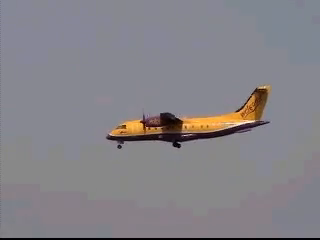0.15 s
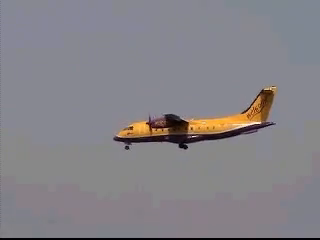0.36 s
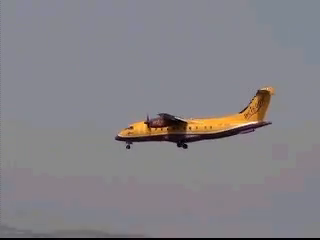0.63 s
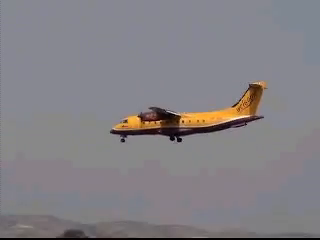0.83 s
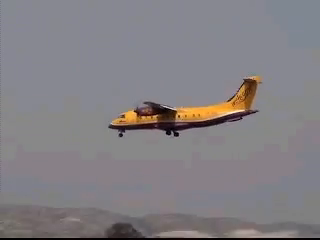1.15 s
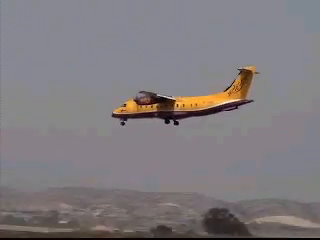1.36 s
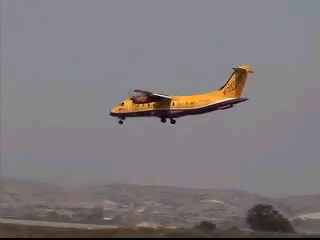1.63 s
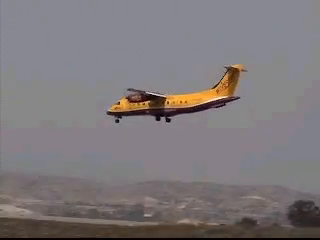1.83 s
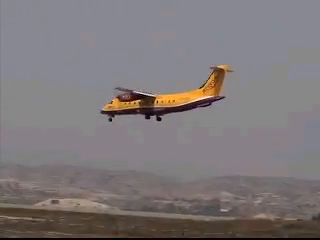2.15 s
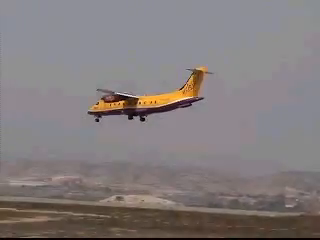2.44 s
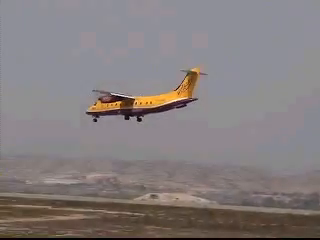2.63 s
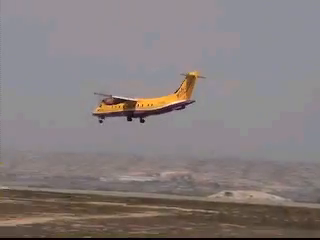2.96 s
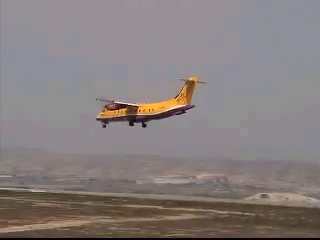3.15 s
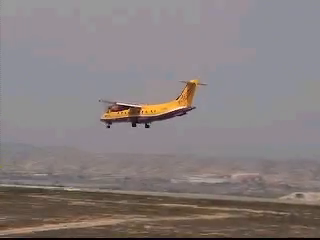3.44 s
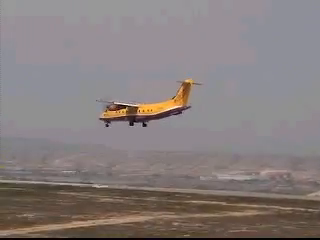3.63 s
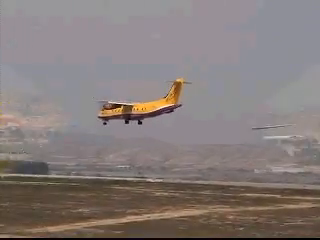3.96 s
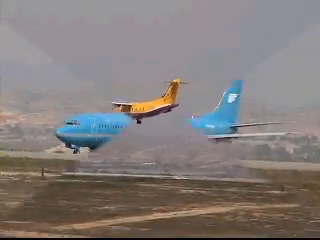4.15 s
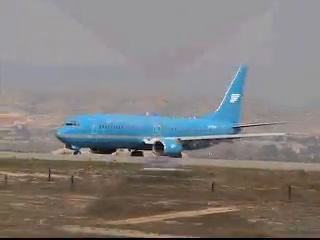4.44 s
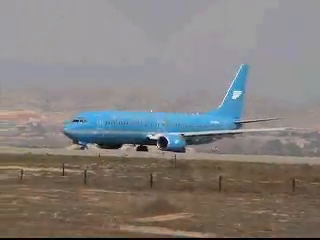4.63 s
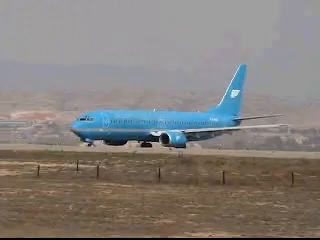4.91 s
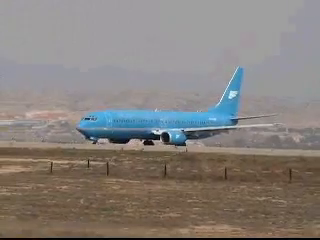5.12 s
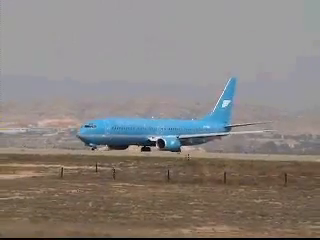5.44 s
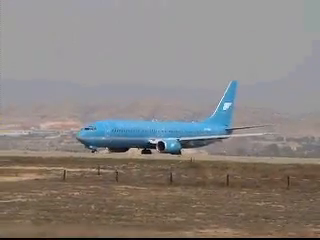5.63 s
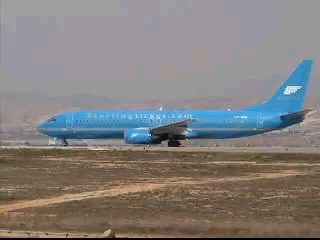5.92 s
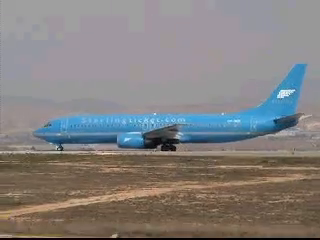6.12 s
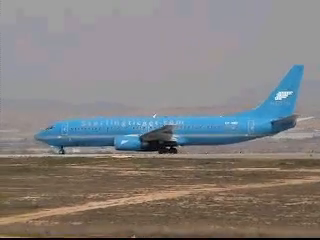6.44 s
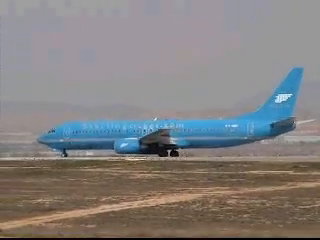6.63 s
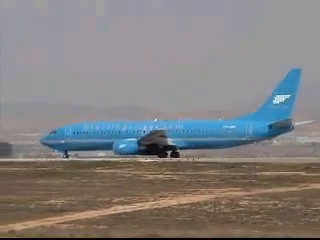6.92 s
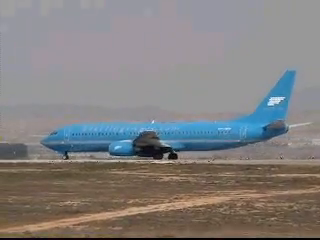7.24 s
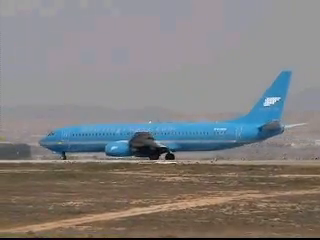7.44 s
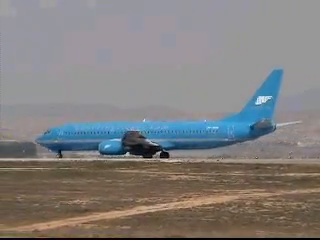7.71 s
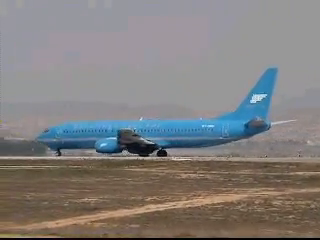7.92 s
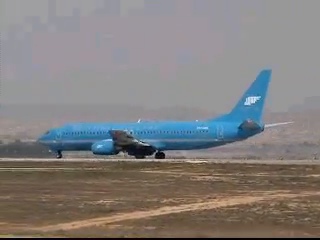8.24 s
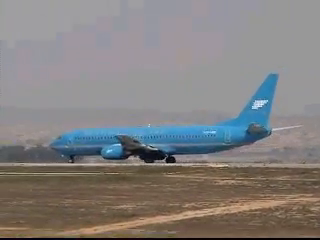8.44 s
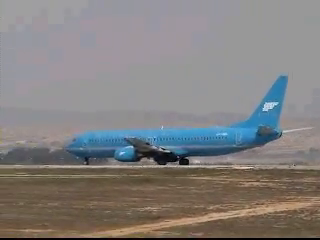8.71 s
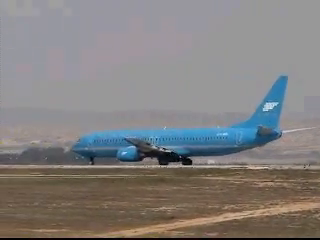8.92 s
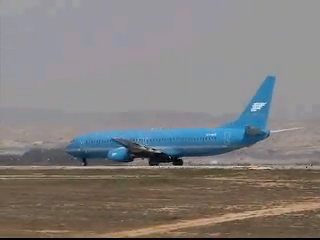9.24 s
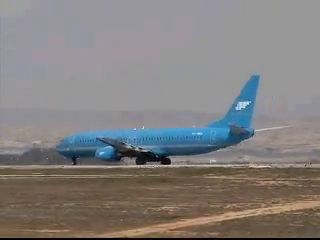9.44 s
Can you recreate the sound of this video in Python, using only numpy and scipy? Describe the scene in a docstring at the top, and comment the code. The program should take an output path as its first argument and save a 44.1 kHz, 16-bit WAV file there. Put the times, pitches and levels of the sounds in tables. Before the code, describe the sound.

Twin-propeller aircraft recedes with falling, wavering buzz and crackly hiss, giving way to a faint taxiing jet's roar, thin whistle and buffeting wind.

```python
"""A twin turboprop draws away past an airfield fence, then fades out as a jet rolling far off fades in.
Its blade tones are fluttering sines of sinking pitch; its exhaust roar is banded noise with a ground echo.
The jet is steadier banded noise with fan tones and a whistle blurred into narrow bands of noise.
Wind adds lumpy low noise and short thumps at the microphone; a narrow digital channel carries it all."""
import sys
import numpy as np
from scipy import signal
from scipy.fft import rfft, irfft, next_fast_len
from scipy.io import wavfile
from scipy.ndimage import uniform_filter1d, minimum_filter1d

SR = 44100
rng = np.random.default_rng(int(sys.argv[2]) if len(sys.argv) > 2 else 0)


def output_pcm(signal):
    """Save a mono or channel-first signal as 16-bit PCM at the path in sys.argv[1].

    Samples are clipped to [-1, 1] before scaling.
    """
    pcm = np.clip(np.atleast_2d(signal).T, -1, 1) * 32767
    wavfile.write(sys.argv[1], SR, np.round(pcm).astype(np.int16))


N = 422037
TIME = np.arange(N) / SR

# Wind gusts over the steady breeze: middle_s, length_s, level_db
GUSTS = [(4.5, 0.45, -36), (5.583, 0.15, -38.5), (5.98, 0.45, -27.5), (6.198, 0.22, -35), (6.38, .24, -31),
         (7.925, 0.2, -36), (8.195, 0.52, -38), (8.45, 0.11, -39), (8.933, 0.2, -45)]
# Single eddies striking the microphone: thump_s, peak_db, pitch_hz
BUFFETS = [(4.658, -16.5, 118), (5.564, -20, 83.4), (5.85, -23, 90), (5.925, -19, 95), (5.969, -18, 75),
           (5.988, -17, 170), (6.007, -10, 150), (6.027, -10.5, 132), (6.05, -20, 120), (6.085, -15, 106),
           (6.163, -20, 110), (6.172, -14.5, 396), (6.181, -19, 160), (6.195, -20, 80), (6.23, -24, 85),
           (6.284, -16, 87), (6.345, -17, 56), (6.397, -15.5, 127), (6.432, -24, 99), (6.932, -21, 150),
           (7.811, -21, 180), (7.879, -21, 155), (7.911, -20, 120), (7.936, -17, 120), (7.987, -24, 80),
           (8.293, -28, 90), (8.316, -13.5, 150), (8.446, -23, 119), (8.482, -20, 100), (8.804, -21, 125),
           (8.89, -23, 130), (8.923, -27, 125)]
# Spectral density of the jet's roar, relative: frequency_hz, density_db
JET_SPECTRUM = [(30, -31), (70, -1), (170, 8), (515, -10), (836, -4.5), (1360, -15.5), (2450, -15.5),
                (4800, -22), (5200, -60)]
# Jet fan tones: time_s, fundamental_db, second_harmonic_db, third_harmonic_haze_db
FAN_LEVELS = [(4.9, -44, -41, -48), (5.3, -37, -44, -44), (5.6, -39, -52, -48), (5.8, -40, -38, -43),
              (6.05, -39.5, -49, -46), (6.3, -35.5, -36.5, -47), (6.6, -38, -44.5, -43),
              (6.95, -38, -40.5, -42.5), (7.2, -39, -50, -35), (7.4, -35.5, -48, -44),
              (7.62, -42, -46, -43), (7.8, -45, -50, -41), (8.1, -41, -46.5, -51), (8.6, -37, -48, -39),
              (8.9, -42, -43.5, -45.5), (9.5, -42, -48.5, -43.5)]
# Jet whistle, which comes and goes: time_s, level_db
WHISTLE_LEVEL = [(4.9, -56), (5.2, -51), (5.3, -57), (5.45, -48), (5.7, -53), (6, -47), (6.1, -58),
                 (6.21, -48), (6.35, -55), (6.65, -52), (6.8, -60), (6.93, -50), (7.03, -58), (7.23, -48),
                 (7.33, -60), (7.48, -48), (7.7, -54), (7.9, -59), (8.17, -52), (8.35, -62), (8.62, -52),
                 (8.95, -56), (9.12, -50), (9.25, -57), (9.55, -55)]
# Blade rate as heard, sinking as the aircraft draws away: time_s, pitch_hz
BLADE_RATE = [(0, 143), (1.35, 140.5), (2.45, 133.5), (4.1, 122.5), (5.1, 113)]
# Propeller tones: time_s, blade_tone_db, second_harmonic_db (the second harmonic is played 1 dB lower)
BLADE_LEVELS = [(0, -32.5, -37), (.55, -29, -32), (.75, -31, -31), (1.3, -20.5, -32), (1.5, -31, -26),
                (1.75, -25, -42), (1.95, -21, -27.5), (2.45, -18.5, -35), (2.75, -21.5, -24.5),
                (2.92, -29, -32.5), (3.05, -25, -29), (3.3, -19.5, -24), (3.48, -27.5, -33),
                (3.62, -20, -24), (3.75, -26.5, -23.5), (3.97, -27, -45), (4.15, -25.5, -30.5),
                (4.45, -33, -41), (4.75, -33, -41), (5.1, -38, -49)]
# Surfacings of the third blade harmonic: middle_s, length_s, level_db (played 1 dB lower)
THIRD_BLADE_SWELLS = [(2.196, 0.64, -28.5), (3.14, 0.65, -26.5)]
# Spectral density of the turboprop's roar, relative: frequency_hz, density_db
ROAR_SPECTRUM = [(30, -34), (85, -12.5), (170, -16), (320, 0), (500, -2.5), (1050, 0.5), (1180, -7),
                 (1400, -7.5), (1700, -8.5), (1930, -6.5), (2100, -14.5), (2550, -4), (2750, -8),
                 (3000, -9), (3900, -6.5), (4200, -2.5), (4420, -4.5), (4800, -3.5), (5200, -23)]
# Turboprop roar by band: time_s, deep_db, low_db, buzz_db, hollow_db, middle_db, upper_db
ROAR_LEVELS = [(0, -34, -29.5, -26, -29, -22.5, -27.5), (.4, -34, -38, -31.5, -27.5, -30, -33.5),
               (.65, -34, -35.5, -28, -27.5, -26.5, -28), (.9, -33, -32, -26.5, -25, -22.5, -29.5),
               (1.15, -33, -31, -28, -26, -20, -28), (1.4, -32, -31, -28, -26.5, -20, -27),
               (1.65, -33, -34, -28, -30, -22, -28), (1.9, -31, -33, -24, -29.5, -24.5, -32),
               (2.15, -34, -29.5, -26, -27.5, -25, -31.5), (2.4, -29, -34, -24, -38, -22, -32.5),
               (2.65, -33, -31.5, -34, -24, -28.5, -27), (2.9, -32.5, -42, -21, -34, -22, -30),
               (3.15, -29, -30, -25.5, -36, -24.5, -29.5), (3.4, -31, -36, -24.5, -29.5, -23.5, -28.5),
               (3.65, -36, -34, -27, -29, -25, -28), (3.85, -30, -34, -28, -29, -27, -29),
               (4, -33, -40, -33.5, -33.5, -27, -32.5), (4.4, -34.5, -39, -30, -35, -28, -34),
               (4.6, -37, -43, -41, -49, -38, -47), (5.1, -49, -48, -48, -52, -39, -36)]
# Turboprop hiss, twinkling in turbulent air:
# time_s, lower_db, middle_db, upper_db (the upper band is played 3.5 dB lower)
HISS_LEVELS = [(0.0, -26, -35, -23), (0.03, -27, -31, -25), (0.06, -34, -36, -33), (0.07, -34, -29.5, -24),
               (0.24, -33, -33, -32), (0.28, -30.5, -27.5, -28), (0.48, -38, -29.5, -27.5),
               (0.68, -25.5, -32, -24), (0.77, -26, -24, -20), (0.79, -30, -34, -27), (0.85, -37, -34, -31),
               (0.88, -30, -24, -32), (0.96, -36, -27.5, -25.5), (1.14, -29, -20.5, -22),
               (1.18, -32, -29, -26), (1.36, -28, -23, -24), (1.39, -27, -27, -31), (1.43, -32, -30, -24),
               (1.48, -30, -25, -35), (1.53, -25.5, -24.5, -20.5), (1.62, -24, -30, -29),
               (1.67, -22, -19, -17.5), (1.73, -28, -30, -20.5), (1.87, -35, -27.5, -33.5),
               (1.89, -32, -34, -27.5), (2.03, -30, -25, -28), (2.23, -31.5, -30.5, -28),
               (2.37, -23, -28, -26.5), (2.41, -27, -24, -20), (2.43, -25, -29, -26), (2.48, -30, -22, -27),
               (2.53, -35, -31.5, -32), (2.64, -36, -32, -23), (2.68, -24, -28, -29), (2.7, -29, -23, -28),
               (2.81, -25, -28, -21.5), (2.84, -34, -25, -26), (2.88, -29, -34, -26),
               (2.94, -28, -27, -21.5), (3.17, -33, -31, -29.5), (3.21, -30, -33, -20),
               (3.22, -31, -23, -21), (3.27, -34, -32, -28), (3.41, -28, -22, -20), (3.49, -29, -30, -27.5),
               (3.54, -26, -29, -20), (3.58, -34, -26, -26), (3.69, -29, -30, -24.5),
               (3.74, -33, -35, -25.5), (3.81, -29, -27, -24.5), (3.93, -33, -28, -23.5),
               (3.95, -31, -26, -20.5), (4.1, -35.5, -31, -28), (4.35, -33, -33, -29),
               (4.67, -52, -42, -41), (4.76, -43, -37.5, -37), (4.94, -48, -44, -36.5),
               (4.96, -50, -56, -58), (5.01, -47, -41, -37), (5.1, -50, -48, -54)]

# Wind
BREEZE_DB, LUMPY_DB = -35.5, 1.5

# Jet
JET_FADE_S = (3.64, 5.2)  # start and end of the fade-in, shared by the wind's rumble
JET_LOW_DB, JET_MID_DB, JET_HISS_DB = -35, -33, -38.5  # at the end of the fade-in
JET_TOP_DB = -4.5  # relative to the hiss below it
JET_SINK_DB_PER_S = 0.18  # as it rolls away
DIP_S, DIP_LENGTH_S, DIP_DB = 6.06, .2, -3.5  # the hiss dips briefly
ABEAM_S, ABEAM_LENGTH_S, ABEAM_DB = 7.1, 2.4, 1.9  # the jet rolls level with the fence
TOP_SWELL_S, TOP_SWELL_LENGTH_S, TOP_SWELL_DB = 5.48, 1.5, 3  # brighter early on
FAN_HZ, SECOND_HZ, THIRD_HZ, WHISTLE_HZ = 838, 1669, 2525, 4340
THIRD_CORE_DB, FOURTH_DB = -50.5, -51.5
HAZE_RATE = 422  # random steps per s that blur the third harmonic's haze
# steady part of each line beside its random part of spread 1
FAN_CLEAR, SECOND_CLEAR, THIRD_CLEAR, WHISTLE_CLEAR = 1.7, 1.7, 1.2, 3.5

# Turboprop
HUM_HZ, HUM_SAG_HZ_PER_S = 688, 30  # a short hum in the roar
HUM_S, HUM_LENGTH_S, HUM_DB = 3.05, .85, -28  # start, length, level
GROUND_SHARE = .38
GROUND_LAG_S, GROUND_TURN_RAD = 0.001385, 1  # bounce off the soil: mean delay, phase

# Channel
BAND_HZ, CHANNEL_RATE_HZ, TOP_HZ = 4500, 32000, 12790
CEILING, LIMIT_S = .7, .004


def undb(db):
    """Level is logarithmic: 20 dB is a factor of ten in amplitude."""
    return 10 ** (np.asarray(db) / 20)


def unit(x):
    """Normalisation to a root-mean-square amplitude of 1."""
    return x / np.sqrt(np.mean(x ** 2))


def columns(table):
    """Linear interpolation of each curve against time, one value per sample."""
    s, *rest = np.transpose(table)
    return [np.interp(TIME, s, c) for c in rest]


def swell(middle_s, length_s):
    """Raised-cosine envelope: a smooth rise from 0 to 1 and back."""
    return np.cos(np.pi * np.clip((TIME - middle_s) / length_s, -.5, .5)) ** 2


def walk(rate):
    """Slow random modulation: levels held 1 / rate s and smoothed twice, of spread 1."""
    hold = int(SR / rate)
    steps = np.repeat(rng.standard_normal(N // hold + 1), hold)
    smooth = uniform_filter1d(uniform_filter1d(steps, hold), hold)
    return unit(smooth[:N])


def bands(spectrum, edges_hz):
    """Spectral shaping of white noise, split at soft edges into neighbouring bands of rms 1."""
    size = next_fast_len(N)
    f = np.maximum(np.arange(size // 2 + 1) * SR / size, 1)
    hz, db = np.transpose(spectrum)
    noise = rfft(rng.standard_normal(size)) * undb(np.interp(np.log(f), np.log(hz), db))
    # each band is the difference of two neighbouring high-pass curves
    above = [1] + [1 / (1 + (e / f) ** 12) for e in edges_hz] + [0]
    return [unit(irfft(noise * (a - b), size)[:N]) for a, b in zip(above, above[1:])]


def tone(hz, db, flutter_db, flutter_rate, waver):
    """Turbulent propagation: a sine flutters in level and wavers in pitch by a given fraction."""
    phase = 2 * np.pi * np.cumsum(hz * (1 + waver * walk(flutter_rate))) / SR
    level = undb(db + flutter_db * walk(flutter_rate))
    return np.sqrt(2) * level * np.sin(phase)


def breathy(hz, blur_rate, clear=0):
    """Random modulation by turbulent air: a line blurs into narrow noise around a clear, wavering share."""
    phase = 2 * np.pi * hz * TIME + np.cumsum(walk(blur_rate)) * blur_rate / SR
    in_phase = (clear + walk(blur_rate)) * np.sin(phase)
    quadrature = walk(blur_rate) * np.cos(phase)
    return unit(in_phase + quadrature)


def wind_rumble():
    """Turbulent pressure fluctuation: lumpy low noise follows the strength of the gusts."""
    strength = undb(BREEZE_DB) + sum(undb(db) * swell(s, length) for s, length, db in GUSTS)
    rumble, = bands([(15, -17), (40, -0.5), (80, 3.5), (150, -7.5), (250, -5.5), (600, -34.0)], ())
    return rumble * strength * undb(LUMPY_DB * walk(26)) * np.interp(TIME, JET_FADE_S, (0, 1))


def wind_buffets():
    """Impulsive pressure: each eddy bursting on the grille gives a short damped oscillation."""
    out = np.zeros(N)
    for s, db, hz in BUFFETS:
        cycles = np.arange(int(3 * SR / hz)) * hz / SR
        start = int((s - .45 / hz) * SR)
        # a quick push and a slower, ringing release
        decay = np.exp(-2.4 * cycles) * (1 - cycles / 3)
        thump = cycles * decay * np.sin(2 * np.pi * cycles)
        out[start:start + len(cycles)] += undb(db) * thump / thump.max()
    return out


def jet_roar():
    """Broadband jet noise: four bands of noise, sinking in level as the jet rolls away."""
    low, mid, hiss, top = bands(JET_SPECTRUM, (300, 1300, 3300))
    mid_db = JET_MID_DB + ABEAM_DB * swell(ABEAM_S, ABEAM_LENGTH_S)
    hiss_db = JET_HISS_DB + DIP_DB * swell(DIP_S, DIP_LENGTH_S) + 0.88 * walk(14)
    # the top follows the hiss and twinkles more
    top_db = hiss_db + JET_TOP_DB + TOP_SWELL_DB * swell(TOP_SWELL_S, TOP_SWELL_LENGTH_S) + .9 * walk(14)
    roar = low * undb(JET_LOW_DB) + mid * undb(mid_db) + hiss * undb(hiss_db) + top * undb(top_db)
    return roar * undb(-JET_SINK_DB_PER_S * (TIME - JET_FADE_S[1]))


def jet_fans():
    """Fan harmonics: periodic tones blurred by turbulent air, the third with a broad haze."""
    first_db, second_db, haze_db = columns(FAN_LEVELS)
    first = breathy(FAN_HZ, 45, FAN_CLEAR) * undb(first_db)
    second = breathy(SECOND_HZ, 95, SECOND_CLEAR) * undb(second_db)
    haze = breathy(THIRD_HZ - 50, HAZE_RATE) * undb(haze_db)
    third = breathy(THIRD_HZ, 90, THIRD_CLEAR) * undb(THIRD_CORE_DB + 2.0 * walk(3))
    fourth = breathy(4 * FAN_HZ, 130, THIRD_CLEAR) * undb(FOURTH_DB)
    return first + second + haze + third + fourth


def jet_whistle():
    """Narrow-band tone: a thin, mostly clear line whose level comes and goes."""
    return breathy(WHISTLE_HZ, 8.4, WHISTLE_CLEAR) * undb(columns(WHISTLE_LEVEL)[0])


def jet():
    """Superposition of roar, fan tones and whistle, faded in together."""
    return np.interp(TIME, JET_FADE_S, (0, 1)) * (jet_roar() + jet_fans() + jet_whistle())


def ground_bounce(roar):
    """Reflection from the soil: a delayed, phase-turned copy interferes with the direct sound."""
    turned = signal.hilbert(roar, next_fast_len(N))[:N] * np.exp(1j * GROUND_TURN_RAD)
    lag_s = GROUND_LAG_S * (1 + 0.012 * walk(1.27))
    return GROUND_SHARE * np.interp(TIME - lag_s, TIME, np.real(turned))


def exhaust_roar():
    """Scattering by eddies: bands of exhaust noise flicker independently about their levels."""
    layers = bands(ROAR_SPECTRUM, (150, 235, 430, 620, 1180, 2050, 2750, 3400, 4050))
    *hiss_db, upper_db = columns(HISS_LEVELS)
    # the very top follows the upper band loosely
    top_db = uniform_filter1d(upper_db, size=SR // 8) - 9.0
    levels = columns(ROAR_LEVELS) + hiss_db + [upper_db - 3.5, top_db]
    # flicker_db, flicker_rate_per_s, from the deepest band to the highest
    scatter = [(1.3, 12), (0.53, 12), (1.2, 20), (0.6, 17), (1.4, 20),
               (0.76, 17), (1.1, 45), (1.3, 55), (1.6, 70), (2.4, 18)]
    return sum(x * undb(db + depth_db * walk(rate))
               for x, db, (depth_db, rate) in zip(layers, levels, scatter))


def roar_hum():
    """Tonal component: a short hum of slowly sagging pitch sounds within the roar."""
    hz = HUM_HZ - HUM_SAG_HZ_PER_S * (TIME - HUM_S)
    # the small power flattens the swell into quick edges and a level middle
    envelope = swell(HUM_S + HUM_LENGTH_S / 2, HUM_LENGTH_S) ** 0.23
    return tone(hz, HUM_DB, 2.2, 25, .009) * envelope


def propeller_blades():
    """Blade-passing harmonics: fluttering sines at one, two and three times a sinking blade rate."""
    hz, = columns(BLADE_RATE)
    first_db, second_db = columns(BLADE_LEVELS)
    first = tone(hz, first_db, 2.2, 22, .012)
    second = tone(2 * hz, second_db - 1, 3, 45, 0.04)
    third_swell = sum(undb(db) * swell(s, length) for s, length, db in THIRD_BLADE_SWELLS)
    return first + second + third_swell * tone(3 * hz, -1, 3, 45, 0.03)


def turboprop():
    """Superposition of blade tones, hum and roar with its ground reflection, faded out at the end."""
    roar = exhaust_roar()
    end_s = ROAR_LEVELS[-1][0]
    fade_out = np.interp(TIME, (end_s - .3, end_s), (1, 0))
    return fade_out * (propeller_blades() + roar_hum() + roar + ground_bounce(roar))


def scene():
    """Linear superposition of wind, jet and turboprop in one channel."""
    return (wind_rumble() + wind_buffets() + jet() + turboprop())[None]


def record(dry):
    """Band limiting, peak limiting and sample-and-hold, whose uneven repeats leave faint mirror images."""
    narrow = signal.sosfilt(signal.cheby1(16, .5, BAND_HZ, fs=SR, output="sos"), dry)
    span = int(LIMIT_S * SR)
    gain = minimum_filter1d(CEILING / np.maximum(np.abs(narrow), CEILING), size=span)
    limited = narrow * uniform_filter1d(gain, size=span)
    slow = signal.resample_poly(limited, 320, 441, axis=1)  # down to the channel's rate
    held = slow[:, np.arange(N) * CHANNEL_RATE_HZ // SR]
    return signal.sosfilt(signal.ellip(16, .2, 60, TOP_HZ, fs=SR, output="sos"), held)


dry = scene()
out = record(dry)
output_pcm(out)
```